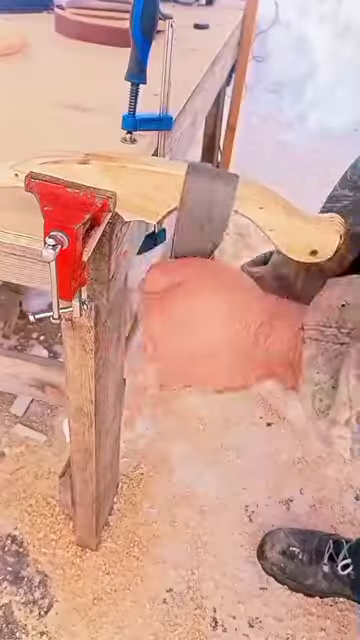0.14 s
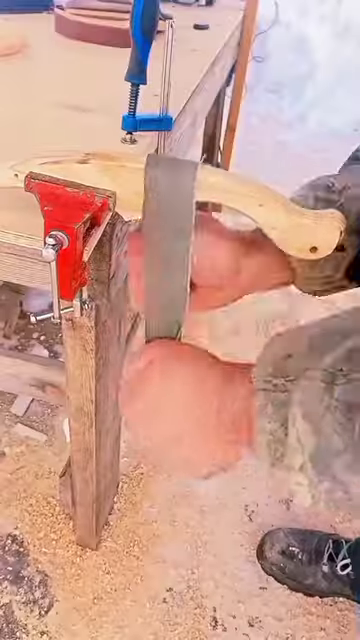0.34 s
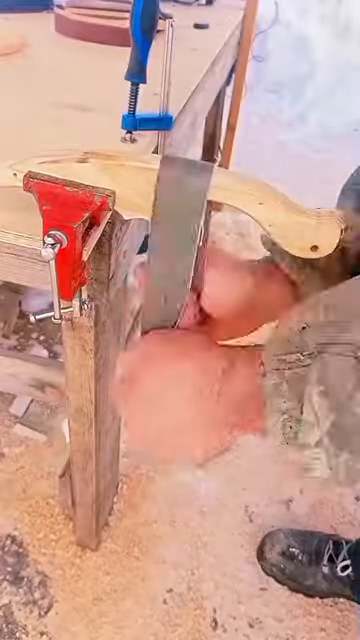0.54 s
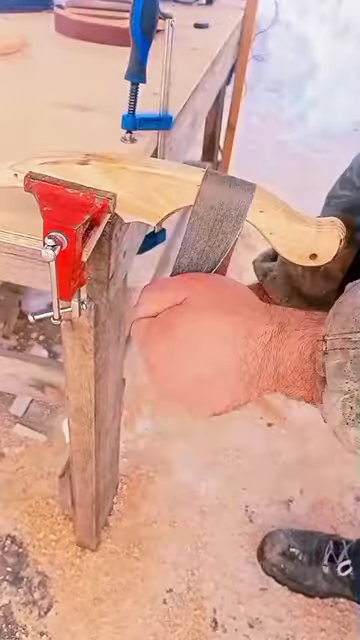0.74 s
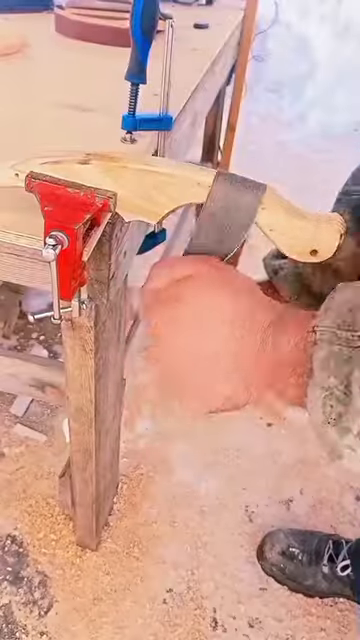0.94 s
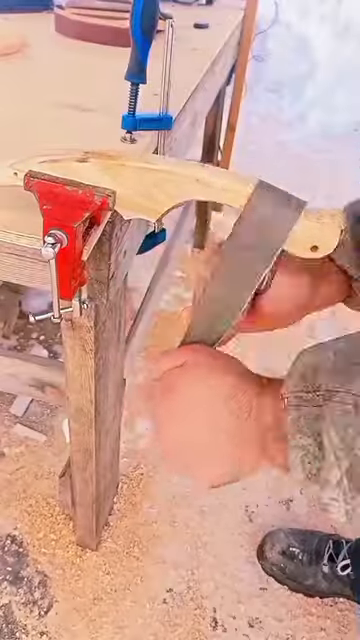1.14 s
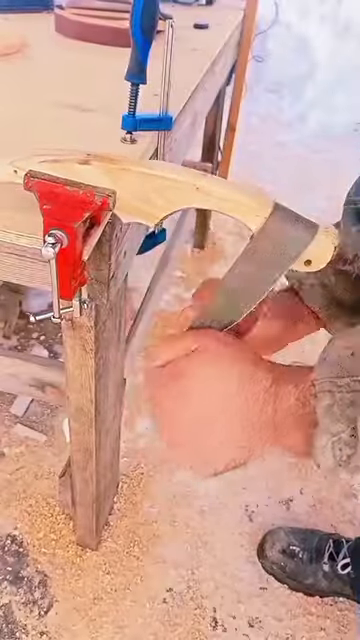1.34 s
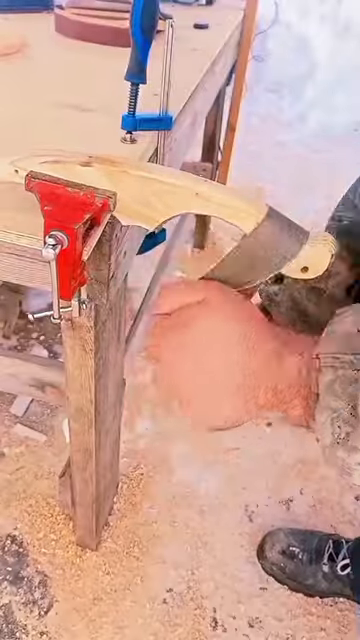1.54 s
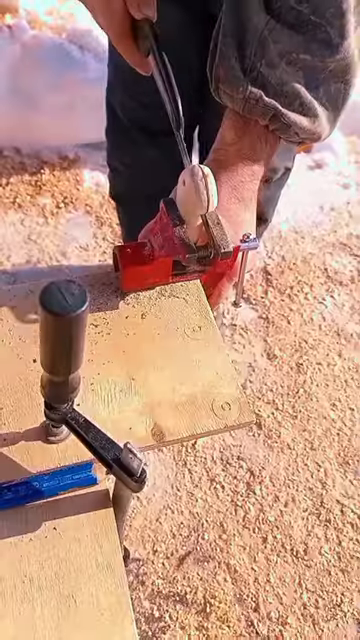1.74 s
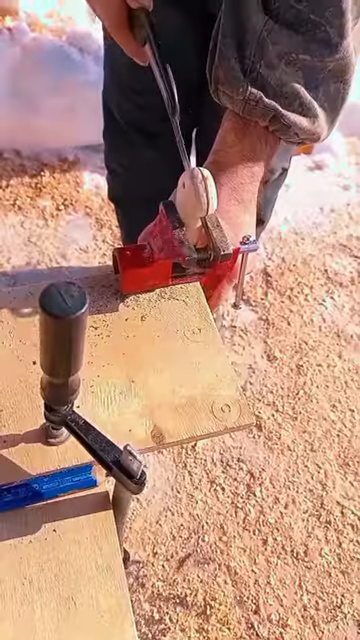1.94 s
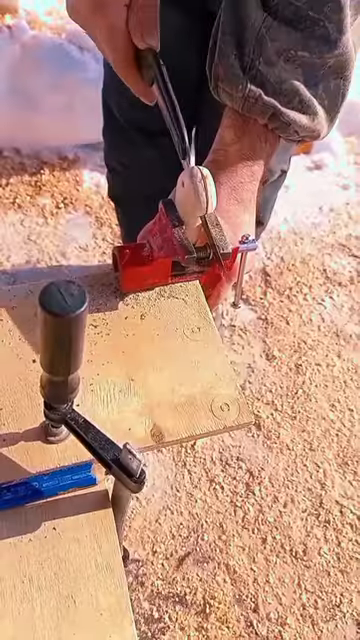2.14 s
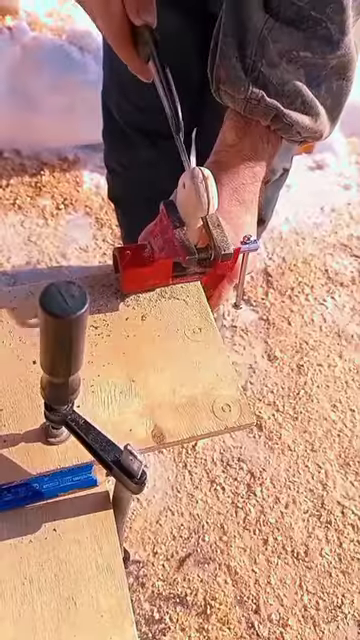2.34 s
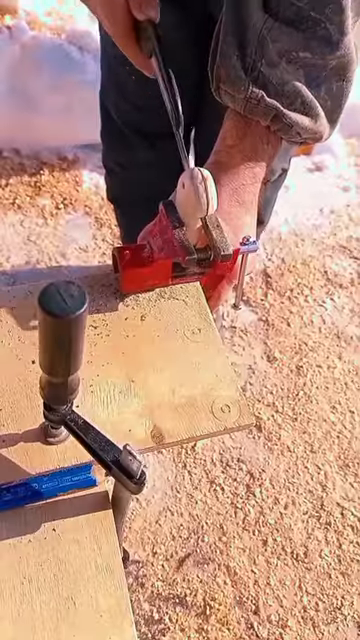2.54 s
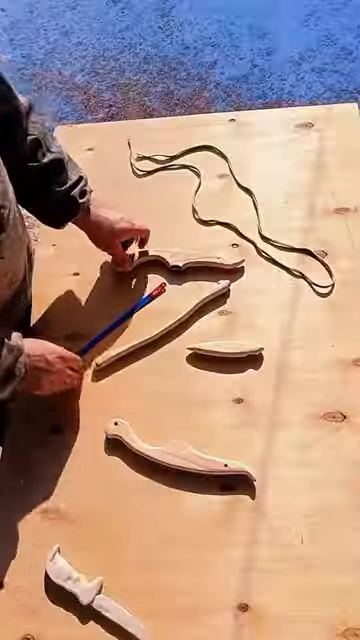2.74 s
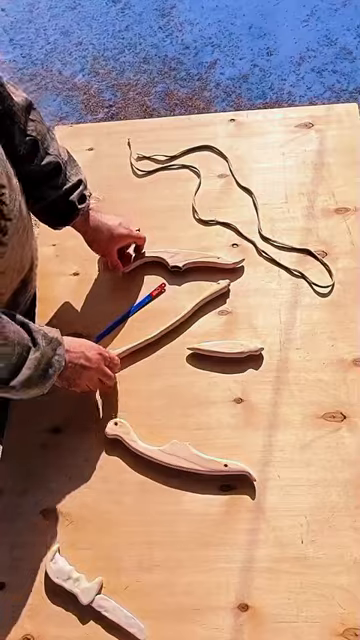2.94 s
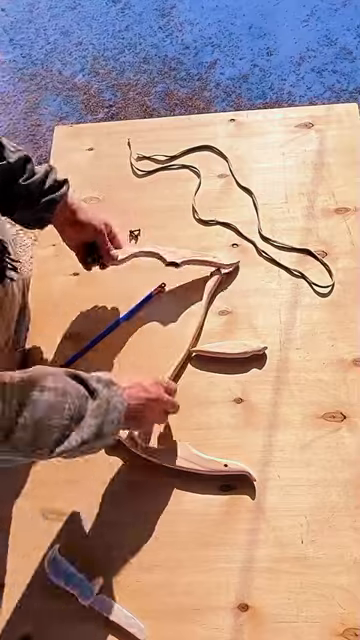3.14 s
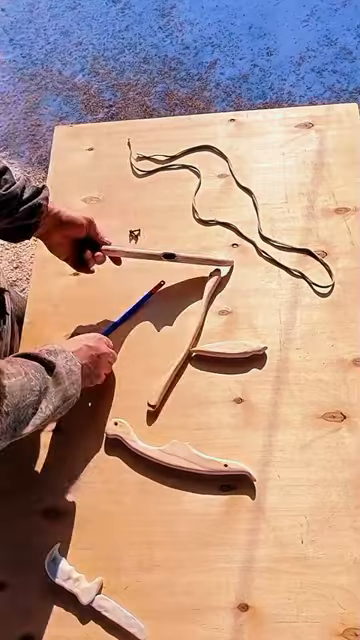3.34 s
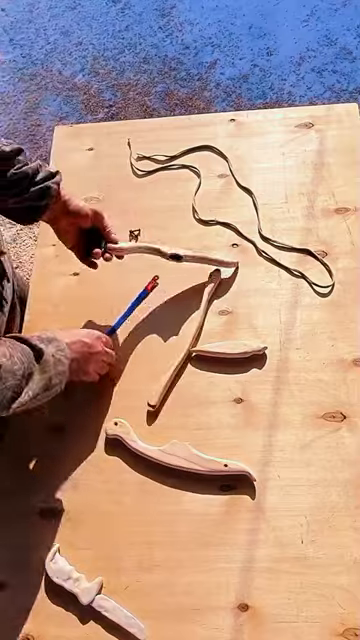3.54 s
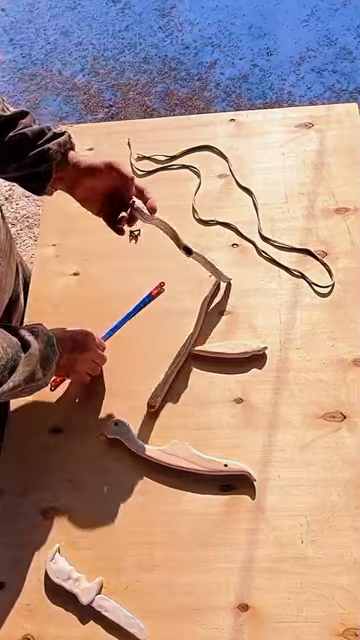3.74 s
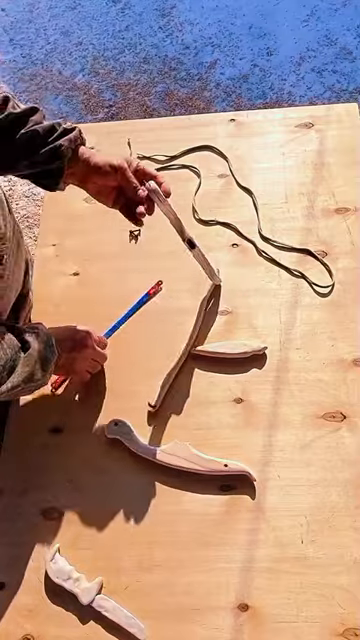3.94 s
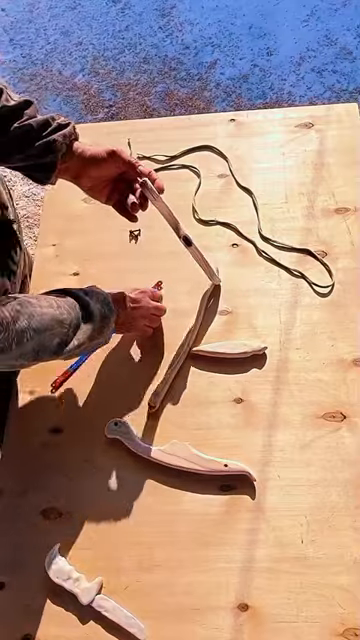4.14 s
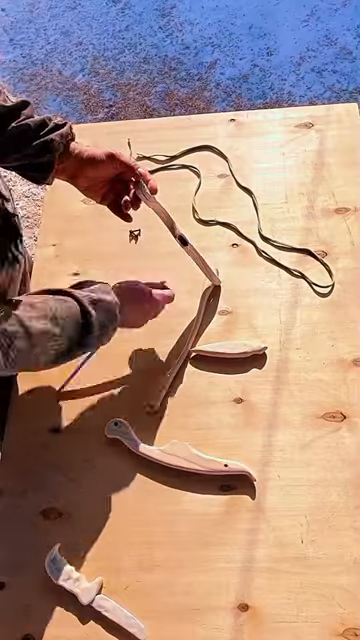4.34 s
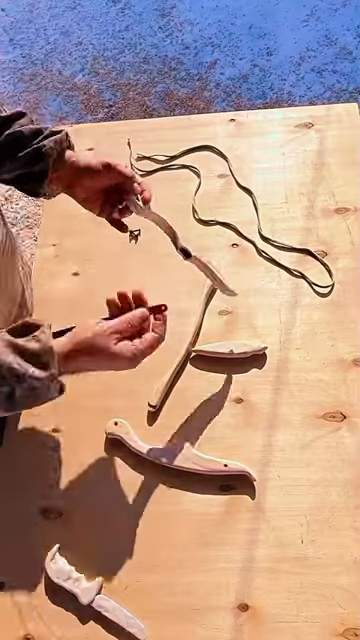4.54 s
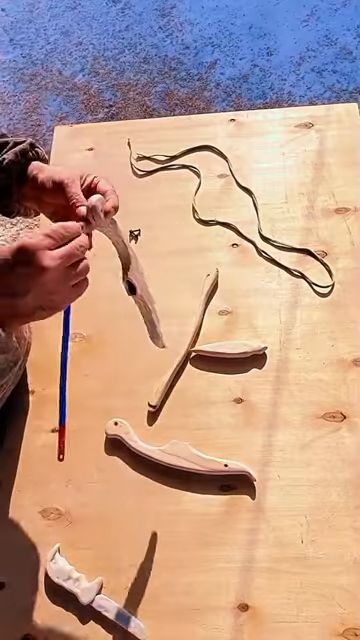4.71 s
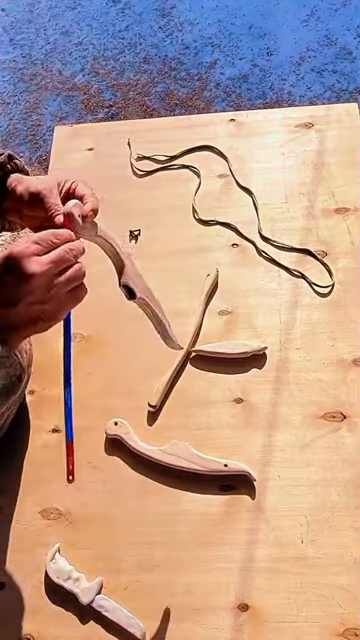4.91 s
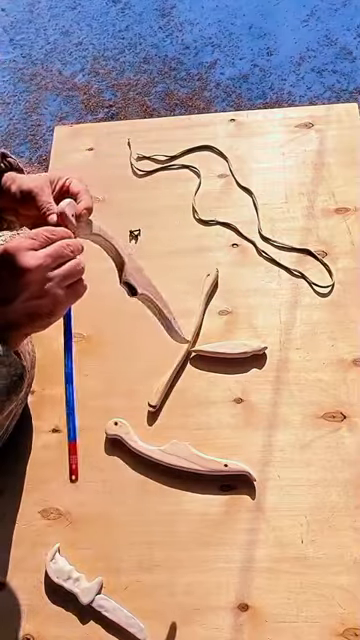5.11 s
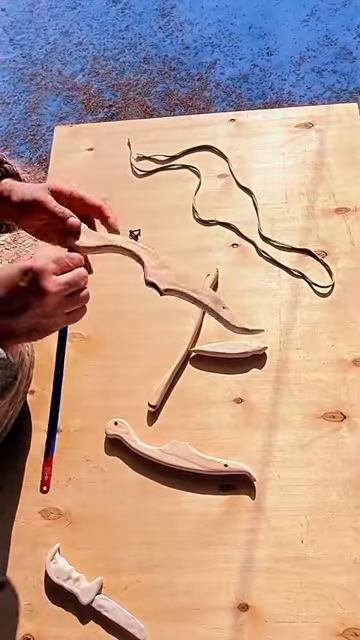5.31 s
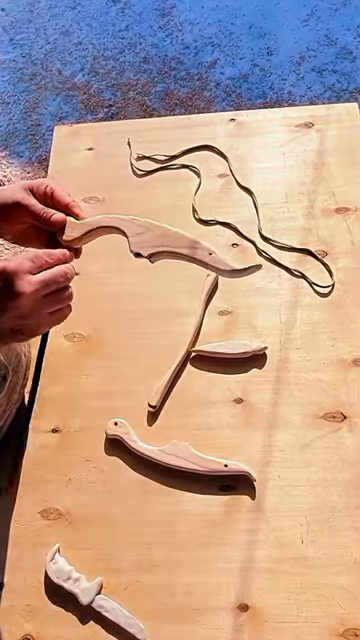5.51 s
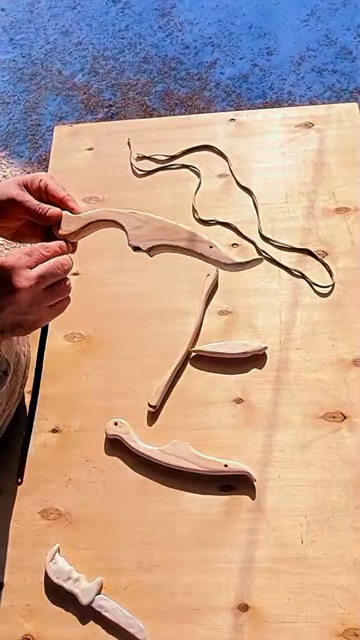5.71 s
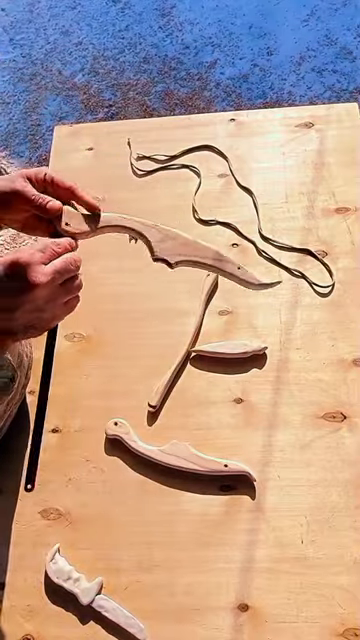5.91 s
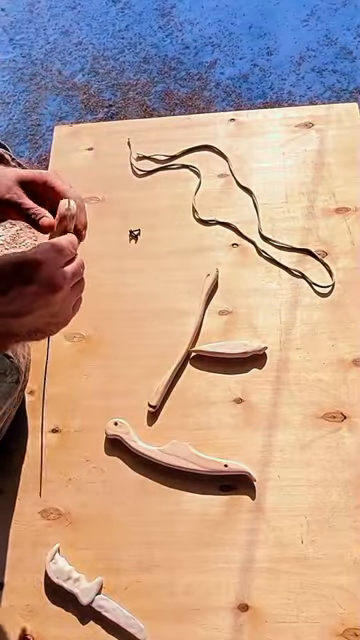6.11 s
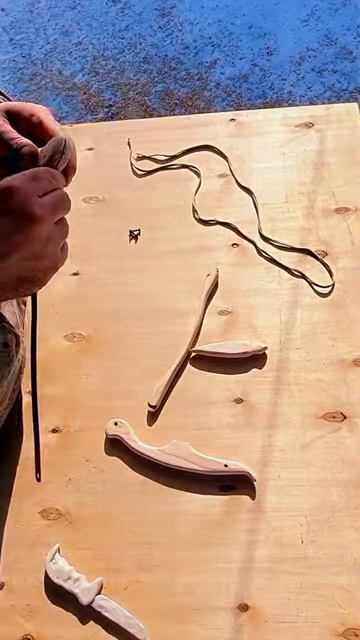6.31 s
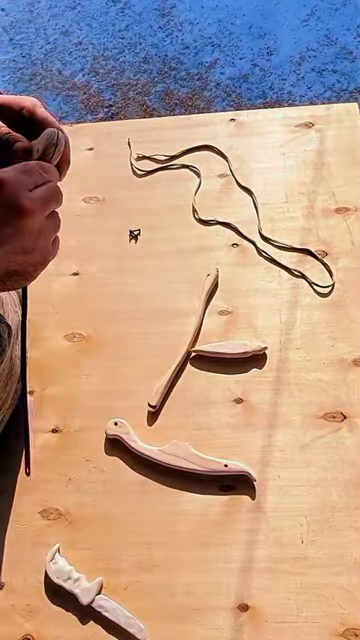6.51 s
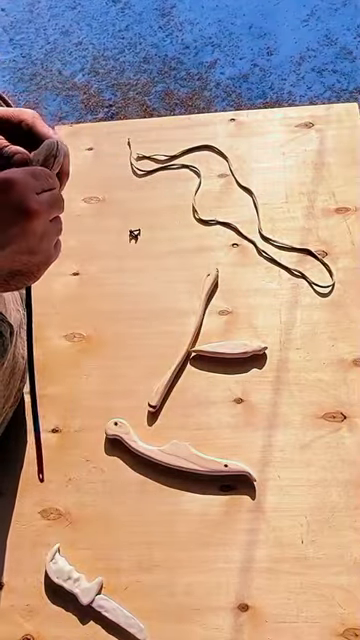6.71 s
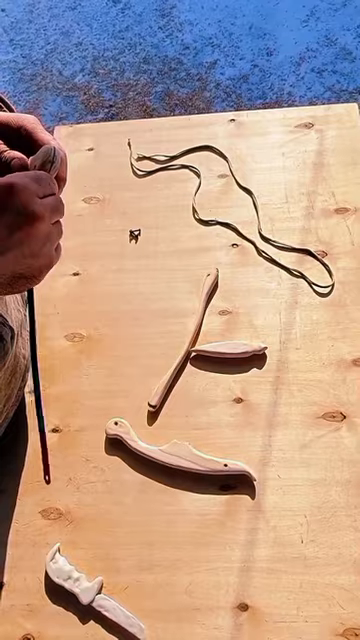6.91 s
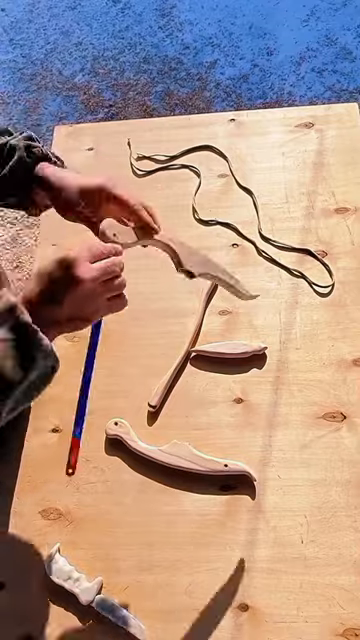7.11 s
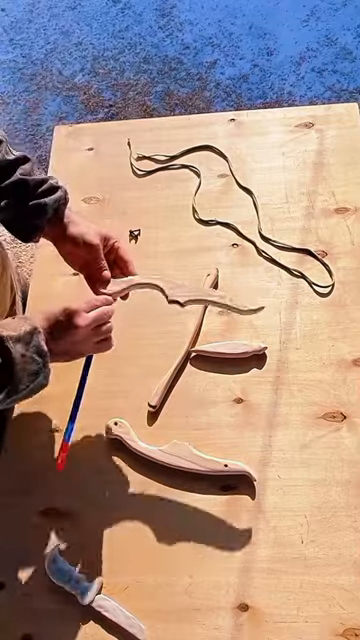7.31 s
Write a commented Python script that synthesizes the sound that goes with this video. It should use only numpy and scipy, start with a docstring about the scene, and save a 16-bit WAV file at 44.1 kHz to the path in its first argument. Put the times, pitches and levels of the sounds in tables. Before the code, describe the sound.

Outdoors, rapid, unnaturally fast sanding on wood is heard up close, bright and gritty with a growing squeal. It cuts to quieter, quick file strokes with short ringing jolts from a vice. After that come light, irregular knocks and drags of wooden pieces on plywood and small metallic ticks from a saw blade as the parts are fitted. A faint hum wavers in the still air behind them.

```python
"""Sanding, filing and fitting wood outdoors

Close by, a sanding strip rasps to and fro in rapid, sped-up strokes round a wooden handle in a vice:
friction makes it ring and squeal, and the bench shakes. A file then works the end, jolting the vice.
Later, wooden parts and a saw blade slide, knock and tick on a plywood sheet, the impacts exciting their
resonant modes, over a faint wavering hum and the hush of open air."""
import sys
import numpy as np
from scipy import signal
from scipy.fft import rfft, irfft, next_fast_len
from scipy.io import wavfile
from scipy.ndimage import uniform_filter1d, map_coordinates

SR = 44100
rng = np.random.default_rng(int(sys.argv[2]) if len(sys.argv) > 2 else 0)


def put_to_file(sound):
    """Save the sound as 16-bit audio at rate SR, in the file named by the first command-line argument."""
    columns = np.atleast_2d(sound).T  # one column per channel
    safe = np.clip(columns, -1, 1)
    whole_steps = np.round(safe * 32767)
    wavfile.write(sys.argv[1], SR, whole_steps.astype(np.int16))


N = 328986


def sanding():
    """Abrasion and stick-slip: grit tears fibres, drives the handle's resonances and shakes the bench."""
    # pull and push in turn: fastest_s, width_s, level_db, relative_ring_db
    passes = [(.017, .034, -21, -18.5), (.078, .025, -19, -19.5), (.131, .029, -18.5, -15),
              (.192, 0.028, -19, -19.5), (0.25, 0.024, -19.5, -21), (.301, .031, -20.5, -18),
              (.362, 0.026, -19, -29), (.418, 0.031, -21, -27.5), (0.477, 0.028, -19.5, -17),
              (0.533, 0.03, -19, -20), (0.592, 0.027, -19.5, -15), (.649, .031, -19.5, -20),
              (.711, 0.027, -21, -13.5), (.767, 0.029, -19, -22), (.826, 0.027, -21, -16.5),
              (.884, 0.034, -22, -15), (.947, .022, -22, -16.5), (.999, 0.029, -21, -15.5),
              (1.06, .026, -21.5, -18), (1.12, 0.032, -23, -9), (1.181, .022, -21, -7),
              (1.236, 0.028, -24.5, 0.2), (1.297, 0.022, -24, -17), (1.35, .029, -27, 1.3),
              (1.41, .023, -22.5, -9), (1.467, 0.031, -23.5, -4), (1.532, .022, -24.5, -6.5),
              (1.59, .028, -25, -3.5), (1.653, .027, -25.5, -5)]
    # spectra of grit on wood, at first and near the handle's end: frequency_hz, density_db
    first_spectrum = [(290, -49.5), (500, -18.5), (1010, -14), (1170, -13.5), (1310, -14), (1960, -8.5),
                      (2200, -5), (3070, 1.5), (4150, -10), (4860, -4.5), (6030, -18.5), (6480, -21.5),
                      (8160, -17), (10700, -29), (15600, -24)]
    end_spectrum = [(290, -52), (500, -24.5), (612, -16), (1060, -23), (1430, -15), (2230, -9.5),
                    (2810, -12.5), (3590, -10), (4270, -22), (5150, -14.5), (6030, -33), (8280, -23),
                    (10700, -38.5), (15600, -34)]
    # handle modes: pitch_hz, width_hz, lift_db
    handle_modes = [(1757, 71, -4.5), (2237, 41, 1), (2476, 83, 0), (2704, 70, -1.5), (3010, 70, -2),
                    (3315, 150, 0), (3670, 150, -1.5), (6450, 97, 3.5), (6960, 160, 1), (8240, 350, 0.5)]
    # a low and a high resonance, rising as the strip moves along: time_s, pitch_hz, width_hz
    handle_track = [(0, 1170, 40), (1.1, 1166, 40), (1.2, 1208, 40), (1.7, 1217, 39.7)]
    whistle_track = [(0, 4780, 201), (.6, 4786, 200.7), (1.1, 4870, 200.6), (1.299, 5070, 200),
                     (1.7, 5240, 200.7)]
    # bright band against stroke, whistle against bright band, squeal against ring: time_s, gain_db
    bright_gain = [(0, -16), (.2, -15), (.55, -12.5), (.72, -17.5), (1.05, -14), (1.2, -10.5), (1.7, -10)]
    whistle_gain = [(0, -9), (.22, -7), (.29, 6), (.55, 5), (.66, -8), (1.1, -7), (1.25, -5), (1.7, -4)]
    squeal_gain = [(0, -19.5), (1.05, -10.5), (1.2, -1.5), (1.7, -1)]
    # vibration of the bench: time_s, level_db
    bench_level = [(0, -37), (.25, -38.5), (.5, -37.5), (.8, -34.5), (1.05, -37), (1.3, -35.5), (1.7, -37)]
    # its spectrum: frequency_hz, density_db
    bench_spectrum = [(18, -63), (30, -34), (59, -31), (119, 3.5), (151, -3), (226, 3.5), (359, -6.5),
                      (600, -7.5), (780, -36), (1320, -120)]
    move_s, stop_s, pull_push_treble_db = (1.08, 1.2), 1.683, (-11.5, -13)
    t = np.arange(N) / SR
    times, widths, db, ring_db = np.transpose(passes)
    bright_db = db + np.interp(times, *np.transpose(bright_gain))
    treble_db = db + np.resize(pull_push_treble_db, len(times))
    bench_db = np.interp(times, *np.transpose(bench_level)) + 0.63 * rng.standard_normal(len(times))
    body, handle, bright, treble, bench = strokes(
        times, widths, [db, db + ring_db, bright_db, treble_db, bench_db],
        rise=.36, fall=1.158, bluntness=3.14, turn_db=-22)
    grains, moved = grit(0.84, 700), np.interp(t, move_s, (0, 1))
    tear = np.sqrt(1 - moved) * wood_colour(grains, first_spectrum, handle_modes, patchy_db=1.72)
    tear += np.sqrt(moved) * wood_colour(grains, end_spectrum, handle_modes, patchy_db=2.0)
    rasp = rubbing(tear, body, bright, treble, edges_hz=(4250, 6000))
    whistle = ring(bright * amp(curves(whistle_gain)[0]), whistle_track, steady=.42)
    phase = 2 * np.pi * np.cumsum(curves(handle_track)[0] + 6 * wobble(30)) / SR
    tone = np.sin(phase) + amp(-9) * np.sin(2 * phase) + amp(-14.5) * np.sin(3 * phase)
    squeal = amp(curves(squeal_gain)[0] + 1.2 * wobble(72)) * uniform_filter1d(handle, 300) * tone
    shake = uniform_filter1d(bench, 1500) * filtered(grit(2.6, 40), colour(bench_spectrum))
    dead_stop = np.clip((stop_s - t) / .003, 0, 1)
    return (rasp + whistle + ring(handle, handle_track, steady=0.55) + squeal + shake) * dead_stop


def filing():
    """Forced vibration: file teeth rasp softly over end grain and drive the resonance of the vice."""
    # push and pull in turn: fastest_s, level_db, relative_ring_db
    passes = [(1.732, -34.5, -14.5), (1.811, -39, -14), (1.884, -36.5, -11), (1.959, -41, -5.5),
              (2.034, -38.5, -16.5), (2.108, -38.5, -17), (2.182, -39.5, -17.5), (2.26, -40, -17),
              (2.334, -38, -2), (2.411, -41, -4), (2.479, -36.5, 0.2), (2.552, -43, -22)]
    # spectrum of teeth on end grain: frequency_hz, density_db
    spectrum = [(24, -72), (40, -70), (117, 2), (235, -14), (388, -1.5), (536, -12.5), (608, -7),
                (780, -11), (1380, -9.5), (2010, -16), (3670, -9), (6190, -39), (8150, -29.5), (9700, -41),
                (15600, -41.5)]
    # modes that colour the rasp: pitch_hz, width_hz, lift_db
    rasp_modes = [(650, 150, -6), (993, 33, 3), (1414, 46, 2.5), (1763, 300, 4), (2190, 56, 3),
                  (2400, 160, 1.5), (3540, 520, -2), (4360, 35, 1), (7040, 250, -2.5), (8500, 180, 1)]
    # resonance of the vice: time_s, pitch_hz, width_hz
    vice_track = [(1.699, 372.3, 30.05), (2.6, 378.3, 30.2)]
    width_s, push_pull_bright_db, push_pull_treble_db = .033, (-7.8, -5), (-20, -16)
    times, db, ring_db = np.transpose(passes)
    bright_db = db + np.resize(push_pull_bright_db, len(times))
    treble_db = db + np.resize(push_pull_treble_db, len(times))
    body, vice, bright, treble = strokes(
        times, np.full(len(times), width_s), [db, db + ring_db, bright_db, treble_db],
        rise=0.49, fall=1.1, bluntness=4.47, turn_db=-15)
    tear = wood_colour(grit(0.7, 700), spectrum, rasp_modes, patchy_db=2.0)
    rasp = rubbing(tear, body, bright, treble, edges_hz=(2900, 5800))
    return rasp + jolts(pitch_hz=vice_track[0][1]) + ring(vice, vice_track, steady=0.46)


def jolts(pitch_hz):
    """Damped free vibration: the vice rings briefly each time the file catches."""
    # catches of the file: start_s, level_db
    catches = [(1.689, -40), (1.715, -29.5), (1.8, -41), (1.827, -31), (1.866, -26.5), (1.949, -30),
               (2.017, -26.5), (2.091, -40), (2.122, -36), (2.166, -28), (2.245, -45), (2.278, -32),
               (2.318, -31), (2.422, -28), (2.467, -35), (2.547, -38.5)]
    rise_s, t60_s = 0.0025, 0.062
    out, t = np.zeros(N), np.arange(SR // 8) / SR
    envelope = amp(-60 * t / t60_s) * (1 - np.exp(-t / rise_s))
    for start_s, db in catches:
        hz = pitch_hz * (1 + rng.normal(0, 0.024))
        out[round(start_s * SR):][:len(t)] += amp(db) * envelope * np.sin(2 * np.pi * hz * t)
    return out


def contacts():
    """Impact excitation: each rattle of blows rings the modes of the sheet, the part and the blade."""
    # knocks, rubs and rattles, the three gains relative to the drive:
    # start_s, drive_db, length_s, sheet_gain_db, part_pitch_hz, part_gain_db, blade_gain_db
    knocks = [(2.614, -46, 0.11, -4, 1520, -10.5, -27), (2.6643, -36, .021, -15, 1830, -12, -30),
              (2.7693, -47.5, .019, 4, 2750, -14, -12), (2.825, -52.5, 0.062, -3, 1730, -5, -18),
              (2.9613, -39.5, 0.027, -3.5, 2600, -19, -18), (2.9994, -54, 0.053, -.7, 2480, -15, -14),
              (3.0493, -50, .06, 2, 1700, -20, -21), (3.1168, -31, .034, 6.5, 2320, -13.5, -34),
              (3.197, -35, 0.015, -11, 1626, -13, -23), (3.292, -50.5, 0.0072, 9, 2600, -14, -16),
              (3.3523, -48.5, 0.037, -2, 1284, -6.5, -21), (3.3874, -37.5, 0.023, 4, 2310, -15.5, -27),
              (3.5209, -54.5, 0.042, -3, 1840, -17, -11), (3.6456, -49.5, 0.052, -6, 3100, -4, -10),
              (3.6994, -48, .05, -11, 3025, -6, -7), (3.7494, -46.5, 0.027, -.6, 3050, -10, -20),
              (3.8076, -41.5, 0.015, -14, 1267, 2, -19.5), (3.812, -42, 0.011, -20, 3040, -1, -32.5),
              (3.8955, -41, .015, -1, 1510, -9, -32), (4.0594, -55, 0.05, -3, 1920, -16, -9),
              (4.3191, -52, .02, 4, 1680, -9, -20), (4.35, -41, 0.018, 0.5, 1772, -10.5, -33),
              (4.455, -44, 0.029, -13, 1850, -18, -14), (4.5945, -50.5, .049, -20, 5270, -15.5, -8),
              (5.0914, -58, .021, -16, 2530, -11, -23), (5.1344, -61.5, .031, -7, 2680, -12.5, -4),
              (5.2774, -61, .04, -4, 2940, -15, -4), (5.339, -51, .021, -12, 2640, -18, -18),
              (5.4794, -57, 0.021, -14, 3030, -10, -24), (5.6955, -54, .016, -14, 3060, -9, -24),
              (5.7235, -53.5, .016, -7, 3020, -10.5, -24), (5.898, -57, .019, -12, 2710, -9, -10),
              (5.9354, -57, .033, -11, 1280, -8, -5), (5.9946, -45.5, .032, -23, 2780, -3, -24),
              (6.0, -60, .04, -17, 1280, -3.5, -24), (6.051, -56.5, .019, -6, 2690, -10, -12),
              (6.1043, -50.5, 0.03, -11, 1280, -15, -9.5), (6.164, -53, 0.038, -3, 2920, -8, -6),
              (6.1945, -46, .031, -18, 3060, -17, -11), (6.5344, -59, .035, -14, 1680, -3, -30),
              (6.54, -59, .03, -20, 2490, -3, -30), (6.44, -65, 0.027, -8, 1770, -10, -25),
              (6.627, -53.5, .017, -17, 1780, -13, -14), (6.6682, -54.5, 0.037, -15, 2545, -12, -23),
              (6.935, -54, .02, -15, 2220, -9.5, -20), (7.002, -52.5, 0.024, -12, 2200, -14, -22),
              (7.069, -60, .019, -4, 2710, -9, -17), (7.1102, -43, .044, -6, 2660, -14, -19),
              (7.167, -38.5, 0.023, -9, 2745, -10.5, -15), (7.1894, -46, .043, -8, 2760, -17, -15),
              (7.2394, -50, .042, -8, 2640, -13.5, -15), (7.409, -56, 0.017, -6, 2950, -9.5, -20)]
    # modes of the plywood sheet and of the saw blade: pitch_hz, width_hz, gain_db
    sheet_modes = [(180, 54, -17), (293, 19.6, 10), (447, 22, 3), (632, 75, 2.5), (840, 44, 6),
                   (1008, 47, 1), (1144, 160, -3.5)]
    blade_modes = [(1277, 37, -3.5), (2860, 64, -5.5), (4250, 78, 6), (4420, 130, -2), (4800, 100, -1),
                   (5420, 180, -9)]
    part_t60_s, overtone_ratio = 0.029, 1.51
    lines, t = np.zeros((4, N + SR)), np.arange(SR // 6) / SR
    for start_s, db, length_s, sheet_db, hz, part_db, blade_db in list(knocks) + ticks(count=12):
        attack_s = length_s * np.interp(db, (-48, -36), (.2, .03))  # harder blows start more sharply
        envelope = np.exp(-(t / max(length_s, .003)) ** 2.56) * (1 - np.exp(-t / attack_s))
        bounce = amp(3.2 * np.repeat(rng.standard_normal(len(t) // 64 + 1), 64)[:len(t)])
        blows = amp(db) * envelope * unit(bounce * rng.standard_normal(len(t)))
        phase = 2 * np.pi * hz * t
        tone = amp(-60 * t / part_t60_s) * (np.sin(phase) + amp(-14.5) * np.sin(overtone_ratio * phase))
        ringing = signal.fftconvolve(blows, tone / np.linalg.norm(tone))[:len(t)]
        at = slice(round(start_s * SR), round(start_s * SR) + len(t))
        lines[:, at] += [amp(sheet_db) * blows, amp(blade_db) * blows, blows, amp(part_db) * ringing]
    on_sheet, on_blade, direct, parts = lines[:, :N]
    sheet = amp(10.5) * filtered(on_sheet, modes(sheet_modes[:3]))
    sheet += amp(9.5) * filtered(on_sheet, modes(sheet_modes[3:]))
    sheet = filtered(sheet, lambda f: lowpass(f, 1800) ** 2)  # wood on wood is a soft contact
    blade = amp(15) * filtered(on_blade, modes(blade_modes[:2]))
    blade += amp(7) * filtered(on_blade, modes(blade_modes[2:]))
    edge_mode = modes([(8150, 1600, -3)])  # steel edges add a crisp top
    edge = filtered(on_blade, lambda f: amp(-11.5) * highpass(f, 5000) ** 3 + edge_mode(f))
    crack = amp(-0.5) * filtered(direct, lambda f: lowpass(f, 3300) ** 4 * highpass(f, 1200) ** 2)
    return sheet + blade + edge + crack + filtered(parts, lambda f: highpass(f, 400))


def ticks(count):
    """Light random impacts as parts are fitted, as rows of knocks; some may fall after the sound ends."""
    return [(np.interp(when, (0, 1), (6.2, 8.1)), -65 + 5 * force, .019, -9, 1700 + 1400 * pitch, -12, -20)
            for when, force, pitch in rng.random((count, 3))]


def sliding():
    """Sliding friction: dragged parts make the sheet boom in lumps and scrape on its grain."""
    # drags over the sheet: start_s, length_s, boom_db, wood_db, scrape_db
    drags = [(2.601, 0.096, -66, -55, -56.5), (2.759, 0.031, -54.5, -51, -60),
             (2.815, 0.063, -60.5, -62, -64), (2.947, 0.14, -54.5, -55.5, -59),
             (3.106, 0.048, -39.5, -55, -52), (3.173, 0.057, -51, -55, -56.5),
             (3.29, 0.047, -58, -58.5, -62), (3.356, 0.065, -54.5, -59, -64), (3.516, .09, -66, -67, -69),
             (3.65, 0.042, -40.5, -60, -62), (3.695, 0.13, -43, -60.5, -63.5),
             (3.884, 0.025, -53, -52, -70), (4.056, 0.11, -69, -64, -64.5),
             (4.154, 0.098, -55, -60.5, -65.5), (4.341, 0.043, -53, -55, -62),
             (4.427, 0.089, -80, -62, -65), (4.559, 0.28, -71.5, -68, -72.5), (5.126, 0.032, -73, -76, -77),
             (5.26, 0.23, -77, -78, -77.5), (5.69, 0.042, -72, -78, -75), (5.95, 0.14, -70, -70, -71),
             (6.11, .13, -70, -71, -75), (6.523, 0.041, -74, -70, -76), (6.621, .11, -78, -74, -79),
             (6.801, .04, -77, -76, -78), (7.051, 0.066, -70, -69, -68), (7.102, .13, -59, -56, -59.5),
             (7.245, .05, -68, -64, -67), (7.403, 0.028, -59.5, -65.5, -75)]
    # hands and sleeves between the drags: time_s, level_db
    rustle = [(2.6, -67), (2.93, -75), (3.5, -70.5), (4.5, -71), (4.8, -77), (4.95, -78), (5.6, -83.5),
              (6.3, -78), (7.46, -80.5)]
    # friction bands, low to high: frequency_hz, density_db
    boom_spectrum = [(24, -77), (40, -62), (128, 3.5), (215, -3.5), (253, -2.5), (335, -18.5), (450, -16),
                     (580, -16), (990, -120)]
    wood_spectrum = [(210, -8), (350, -6), (420, -3), (501, -5), (816, -5), (899, -7), (1500, -17),
                     (1950, -32), (3300, -120)]
    scrape_spectrum = [(710, -23.5), (1200, -5), (1340, -3), (1720, 0.5), (2170, 1), (2820, 0), (4600, -12),
                       (5980, -34), (10100, -120)]
    fizz_spectrum = [(2350, -1), (4000, -4), (4430, -26), (5860, -10), (7520, -3.5), (8150, 1.5),
                     (10200, -12.5), (14900, -13.5), (15600, -29)]
    rise_s, fall_s, fizz_db = .012, 0.02, -13.5
    t = np.arange(N) / SR
    rustle_level = amp(curves(rustle)[0] + 1.2 * wobble(9))
    envelopes = np.outer(amp((-2, 1.5, -1.5)), rustle_level)  # boom, wood, scrape
    for start_s, length_s, *db in drags:
        at = slice(round(start_s * SR), round((start_s + length_s + .2) * SR))
        age = t[at] - start_s
        shape = (1 - np.exp(-age.clip(0) / rise_s)) * np.exp(-np.maximum(age - length_s, 0) / fall_s)
        envelopes[:, at] = np.hypot(envelopes[:, at], amp(db)[:, None] * shape)  # powers add
    lumps = amp(1.5 * wobble(35)) * (t > drags[0][0])
    boom = envelopes[0] * filtered(grit(0.9, 60), colour(boom_spectrum))
    wood = envelopes[1] * filtered(grit(1.197, 130), colour(wood_spectrum))
    grain = grit(1.76, 300)
    fizz = amp(fizz_db) * filtered(grain, colour(fizz_spectrum))
    scrape = envelopes[2] * (filtered(grain, colour(scrape_spectrum)) + fizz)
    return lumps * (boom + wood + scrape)


def air():
    """Broadband and narrowband noise: the outdoor hush and a faint, wavering hum."""
    # spectrum of the hush: frequency_hz, density_db
    spectrum = [(15, -32), (25, -6), (49, -15), (129, -2), (306, 0), (359, -3), (633, -1.5), (1110, -10),
                (2710, -16), (5910, -26.5), (15600, -31)]
    # level of a faint, unevenly wavering background tone: time_s, level_db
    hum_level = [(2.6, -63), (2.96, -87), (3.24, -70), (3.45, -82), (3.7, -58), (3.9, -74), (4.2, -60),
                 (4.45, -78), (4.72, -70), (4.9, -80), (5.5, -85), (5.8, -76.5), (7.46, -83)]
    hush = amp(-76 + 1.5 * wobble(5.7)) * filtered(rng.standard_normal(N), colour(spectrum))
    hum_drive = amp(curves(hum_level)[0] + 2.5 * wobble(7.3))
    return hush + ring(hum_drive, [(0, 623.7, 29.96), (8, 626, 30)], steady=0.2)


def strokes(times, widths, levels, rise, fall, bluntness, turn_db):
    """Reciprocating motion: speed rises fast, falls slower, never quite rests; one envelope per band."""
    t, out = np.arange(N) / SR, np.zeros((len(levels), N))
    for fastest_s, width_s, db in zip(times, widths, np.transpose(levels)):
        at = slice(max(0, round((fastest_s - .06) * SR)), round((fastest_s + .12) * SR))
        u = (t[at] - fastest_s) / width_s
        shape = np.exp(-np.abs(np.where(u < 0, u / rise, u / fall)) ** bluntness)
        turn = amp(turn_db) * np.exp(-(u / 1.2) ** 2)
        out[:, at] += amp(db)[:, None] * (shape + turn)
    return out


def grit(bite_db, rate_hz):
    """Amplitude-modulated noise: grains catch and tear fibres in uneven bites."""
    return unit(amp(bite_db * wobble(rate_hz)) * rng.standard_normal(N))


def wood_colour(x, spectrum, peaks, patchy_db):
    """Resonant filtering: modes sharpen a broad spectrum that shifts in patches as the contact moves."""
    frames = signal.stft(x, nperseg=256)[2]
    patches = uniform_filter1d(rng.standard_normal(frames.shape), size=3, axis=0)
    patches = uniform_filter1d(patches, size=14, axis=1)
    patchy = signal.istft(frames * amp(patchy_db * unit(patches)), nperseg=256)[1][:N]
    lift = lambda f: 1 + sum(np.abs(modes([row])(f)) ** 2 for row in peaks)
    return unit(filtered(patchy, lambda f: colour(spectrum)(f) * lift(f)))


def rubbing(tear, body, bright, treble, edges_hz):
    """Band splitting: three bands of friction noise have their own envelopes, so push and pull differ."""
    low, low_and_mid = (filtered(tear, lambda f: 1 / (1 + (f / edge) ** 16)) for edge in edges_hz)
    return body * low + bright * unit(low_and_mid - low) + treble * unit(tear - low_and_mid)


def ring(drive, track, steady):
    """Noise-driven resonance on a (time_s, pitch_hz, width_hz) track; steady (0-1) evens its flutter."""
    hz, width_hz = curves(track)
    lag = lambda f: lowpass(f, np.mean(width_hz) / 2)
    real, imag = (filtered(rng.standard_normal(N), lambda f: lag(f) * lag(f / 3)) for _ in range(2))
    phasor = real + 1j * imag
    flutter = unit(phasor / np.abs(phasor) ** steady)
    carrier = np.exp(2j * np.pi * np.cumsum(hz) / SR)
    return np.sqrt(2) * filtered(drive, lambda f: lag(f / 3.8)) * np.real(flutter * carrier)


def modes(rows):
    """Modal superposition: response of (pitch_hz, width_hz, gain_db) resonances of alternating sign."""
    return lambda f: sum((-1) ** k * amp(db) * 1j * f * width / (hz * hz - f * f + 1j * f * width)
                         for k, (hz, width, db) in enumerate(rows))


def colour(points):
    """Spectral shaping through (frequency_hz, density_db) points; white noise keeps its power."""
    hz, db = np.transpose(points)
    return lambda f: unit(amp(np.interp(np.log(f + 1), np.log(hz + 1), db, left=-120, right=-120)))


def lowpass(f, corner_hz):
    """First-order low-pass response."""
    return 1 / (1 + 1j * f / corner_hz)


def highpass(f, corner_hz):
    """First-order high-pass response."""
    return 1 / (1 - 1j * corner_hz / (f + 1))


def filtered(x, response):
    """Linear filtering: the spectrum of x times a complex frequency response."""
    size = next_fast_len(N + SR // 2)
    return irfft(rfft(x, size) * response(np.fft.rfftfreq(size, 1 / SR)), size)[:N]


def wobble(rate_hz):
    """Smooth random modulation: a spline through rate_hz knots a second."""
    knots = rng.standard_normal(int(N * rate_hz / SR) + 4)
    return map_coordinates(knots, [np.arange(N) * rate_hz / SR])


def curves(rows):
    """Linear interpolation: one value per sample for each column after the time."""
    times, *columns = np.transpose(rows)
    return [np.interp(np.arange(N) / SR, times, column) for column in columns]


def amp(db):
    """Decibels to amplitude ratio."""
    return 10 ** (np.asarray(db) / 20)


def unit(x):
    """Normalisation to unit RMS."""
    return x / np.sqrt(np.mean(np.abs(x) ** 2) + 1e-20)


def scene():
    """Superposition: the sources add in one channel."""
    return (sanding() + filing() + sliding() + contacts() + air())[None]


def record(dry):
    """Band limiting: the microphone drops the deep bass and keeps nothing above its upper limit."""
    bass_hz, top_hz = 30, 15750
    return filtered(dry[0], lambda f: (f < top_hz) * highpass(f, bass_hz) ** 2)[None]


dry = scene()
out = record(dry)
put_to_file(out)
```